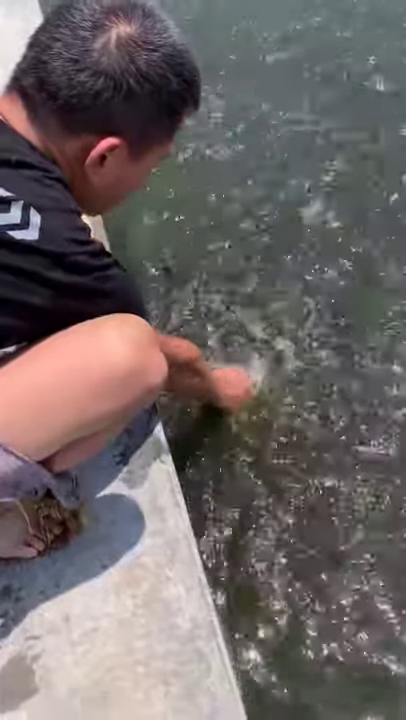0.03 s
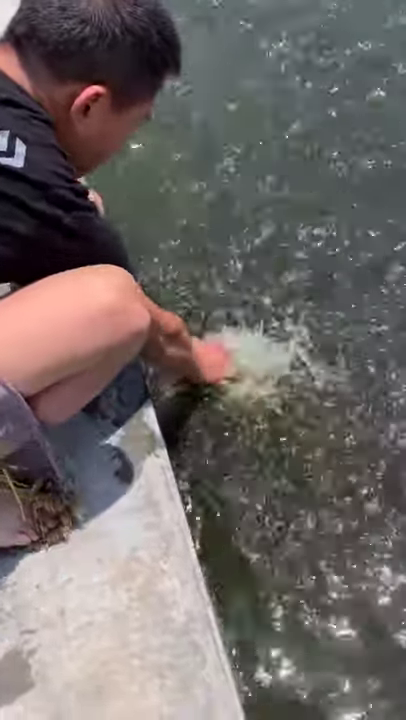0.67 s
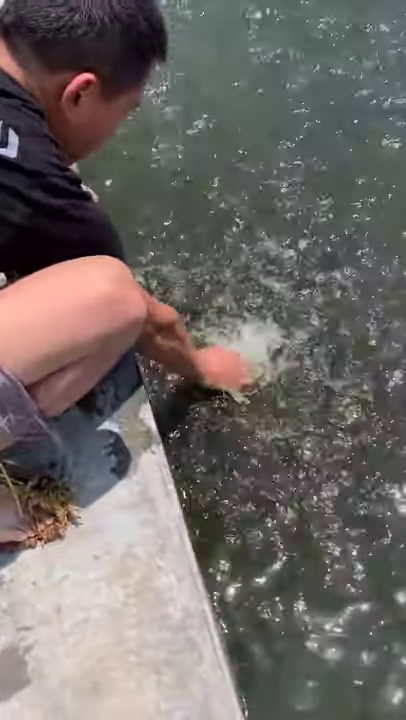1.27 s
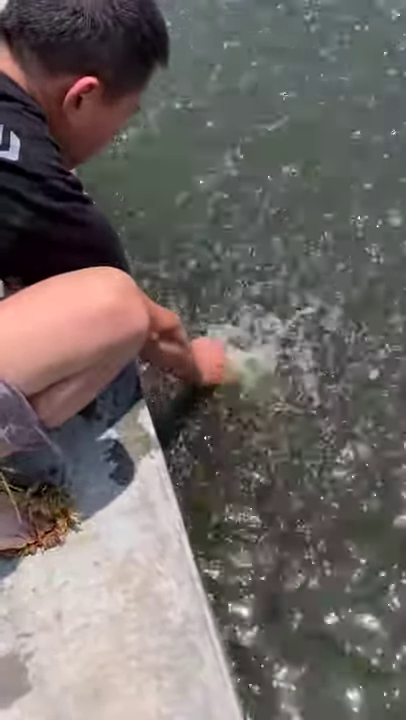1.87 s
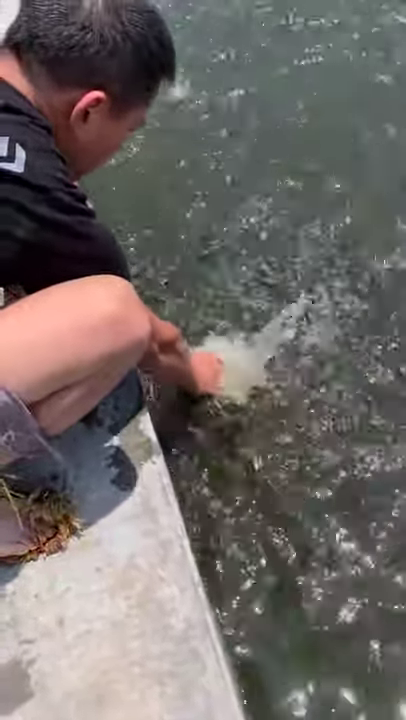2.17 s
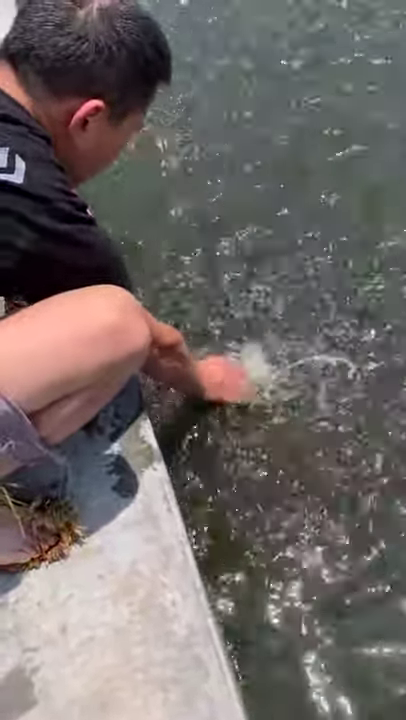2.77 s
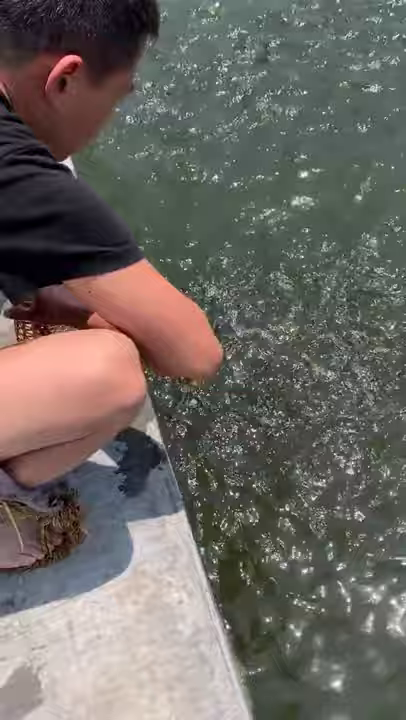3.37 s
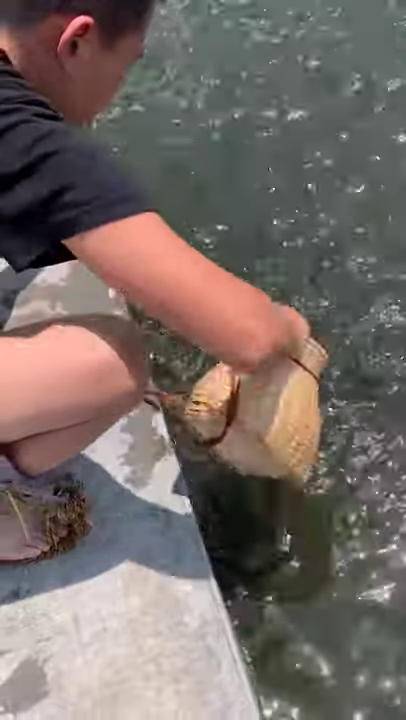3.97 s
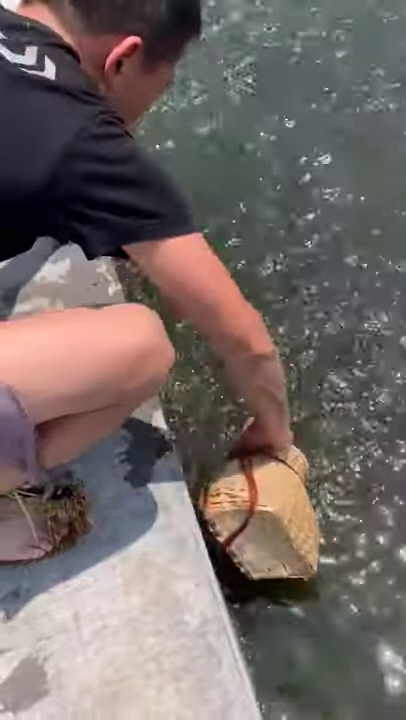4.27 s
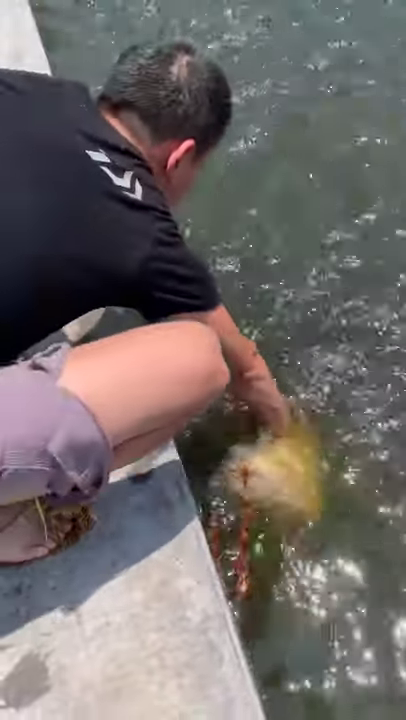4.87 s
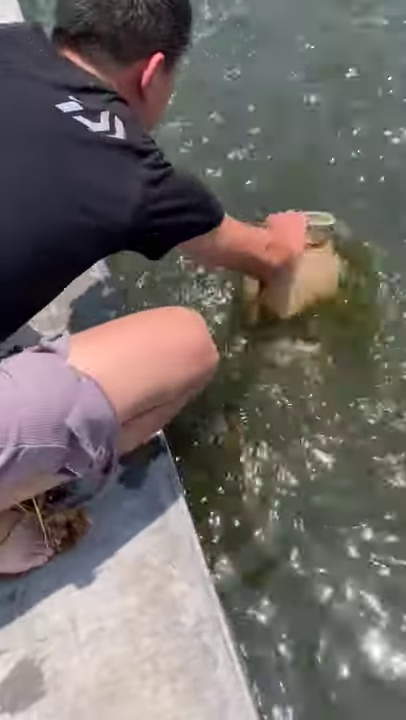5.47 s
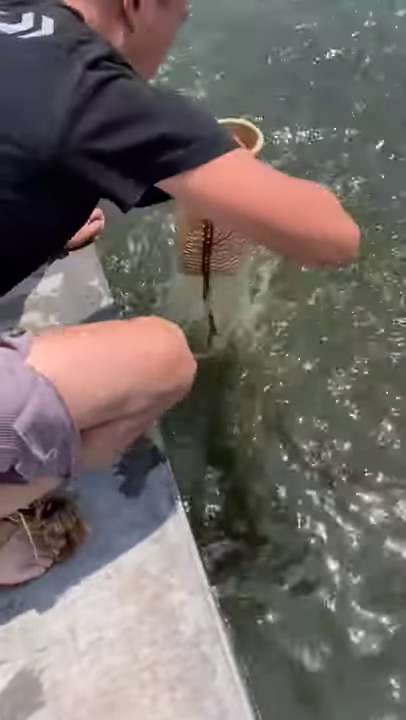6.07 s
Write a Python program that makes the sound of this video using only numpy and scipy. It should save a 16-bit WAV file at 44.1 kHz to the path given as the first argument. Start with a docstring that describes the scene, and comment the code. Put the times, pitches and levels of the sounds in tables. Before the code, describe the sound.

At a riverside ledge, gusty wind buffets a close microphone with low rumbles and pops. Over it, a hand churns the water in a fast run of bright, bubbly splashes, then stops. Ripples lap quietly and a wicker basket ticks as it is picked up. It sloshes and glugs as it is dragged under, and finally water streams from it back into the river.

```python
"""At a windy riverside ledge, gusts rumble and pop on the two ports (openings) of a close microphone.
For three seconds a hand swishes to and fro in the water, about twelve slaps a second, throwing spray
and trapping air that rings as bubbles. Then a wicker basket is picked up, dipped and dragged under
with a few deep glugs. Last it is lifted, and water streams through its weave back into the river."""
import sys
import numpy as np
from scipy import signal
from scipy.fft import rfft, irfft, next_fast_len
from scipy.io import wavfile
from scipy.ndimage import uniform_filter1d

SR = 44100
rng = np.random.default_rng(int(sys.argv[2]) if len(sys.argv) > 2 else 0)


def log_audio(samples):
    """Write samples as a 16-bit WAV file to the path given in sys.argv[1]."""
    # one column per channel
    frames = np.atleast_2d(samples).T
    # limit to full scale, then quantise
    limited = np.clip(frames, -1, 1)
    pcm = np.round(limited * 32767).astype(np.int16)
    wavfile.write(sys.argv[1], SR, pcm)


N = 274743
TIME = np.arange(N) / SR
FFT_SIZE = next_fast_len(N + 8192)
FREQS_HZ = np.maximum(np.arange(FFT_SIZE // 2 + 1) * SR / FFT_SIZE, 1)
CUTOFF_HZ = 15800

# Levels in the tables are relative: the functions add gains of their own.
# the hand slaps the water on each stroke: middle t/s, level/dB, length/s, extra treble/dB
HAND_SLAPS = [(0.19, -37, 0.011, 4), (0.308, -30, 0.012, 8.5), (0.404, -24.5, 0.0054, 5),
              (0.495, -37, 0.14, -8), (0.589, -22.5, 0.0048, 1), (0.68, -20.5, 0.0075, 2.5),
              (0.75, -21, 0.014, -14), (0.77, -29, 0.014, -31), (0.813, -24, 0.0054, -8),
              (0.848, -34.5, 0.059, 10.5), (0.928, -16.5, 0.0056, -2), (1.005, -24, 0.0099, 6),
              (1.093, -24, 0.019, -11), (1.172, -19.5, 0.013, 0.5), (1.268, -25, 0.013, -3),
              (1.342, -24, 0.011, 1), (1.441, -21, 0.007, -4), (1.522, -29.5, 0.017, 6),
              (1.601, -25.5, 0.017, 0.5), (1.682, -23, 0.009, 1.5), (1.771, -25, 0.019, -5),
              (1.847, -25.5, 0.006, 0.5), (1.941, -24.5, 0.014, -1.5), (2.017, -24, 0.013, -0.5),
              (2.105, -25.5, 0.013, -2), (2.17, -24.5, 0.0039, 1), (2.177, -28.5, 0.029, 0.5),
              (2.261, -25, 0.02, -8.5), (2.34, -29.5, 0.024, -2), (2.433, -26.5, 0.026, -6),
              (2.505, -22, 0.016, -1.5), (2.598, -24.5, 0.016, -2.5), (2.685, -22.5, 0.0058, -27),
              (2.774, -28, 0.013, 1), (2.846, -21.5, 0.0087, -16), (2.931, -19, 0.012, -8),
              (3.015, -32.5, 0.02, 5)]
# water slops against the basket: middle t/s, level/dB, length/s, extra treble/dB
BASKET_SLOSHES = [(4.794, -34.5, 0.021, -6), (4.91, -36, 0.035, -12), (4.94, -32, 0.035, -29),
                  (4.972, -31, 0.012, -15), (5.033, -47, 0.021, 2), (5.09, -37.5, 0.016, -15),
                  (5.753, -38.5, 0.092, -27)]
# tone of splashing spray: f/Hz, level/dB
SPLASH_SPECTRUM = [(250, -10), (600, 1.5), (1000, -12), (1400, -3), (1800, 6), (2200, -0.5), (2900, -0.5),
                   (4000, -0.5), (5300, -6.5), (6300, -2), (7600, -10), (9200, -5), (11000, -9),
                   (15500, -13)]
# pockets of air snap shut: t/s, level/dB, centre f/Hz
AIR_CRACKS = [(0.319, -15, 2500), (0.59, -7, 2680), (0.6803, -10, 4450), (0.701, -13, 2600),
              (0.7505, -15, 2570), (0.7705, -8, 2200), (0.863, -9.5, 4960), (0.926, -17, 3600),
              (0.932, -6, 3850), (0.9544, -13, 2200), (1.0077, -9.5, 4160), (1.0153, -10.5, 5600),
              (1.34, -14, 3800), (1.354, -15, 4230), (1.4373, -12, 3280), (1.5168, -6, 4830),
              (1.614, -5, 4050), (1.9457, -14, 2570), (2.0137, -15.5, 4570), (2.1663, -15, 2280),
              (2.188, -22, 1890), (2.35, -14, 3700), (2.5161, -3.5, 3670), (2.521, -7, 3220),
              (2.6653, -17, 1810), (2.778, -14.5, 3860), (2.85, -11.5, 2620), (2.905, -20, 5540),
              (2.9358, -14.5, 3000), (3.008, -21, 5530), (4.855, -24, 4400), (4.9735, -19, 2470)]
# how hard the hand churns the water: t/s, level/dB
CHURN_LEVEL = [(0.0, -30), (0.76, -31.5), (1.53, -30.5), (2.23, -38), (2.82, -30.5), (3.1, -43.5)]
# the hand leaves the water: start t/s, end t/s
HAND_OUT_S = [3.0, 3.11]
# the basket enters the water: start t/s, end t/s
BASKET_IN_S = [4.3, 4.8]
# flow of water, first as ripples, then through the basket: t/s, level/dB
FLOW_LEVEL = [(3.0, -26), (3.14, -40), (3.72, -40.5), (4.03, -44), (4.16, -48.5), (4.28, -51.5),
              (4.41, -42.5), (4.75, -43), (4.97, -36), (5.12, -44.5), (5.3, -43), (5.5, -42.5),
              (5.55, -35.5), (5.73, -43), (5.79, -33), (6.0, -35.5), (6.23, -32)]
# tone of trickling water: f/Hz, level/dB
TRICKLE_SPECTRUM = [(400, -10), (750, -18), (1300, -6), (1900, -0.5), (2300, -4.5), (3200, -1.5), (4300, 1),
                    (5400, -1), (6300, -1), (7600, -7.5), (9200, -1.5), (11000, -5), (13000, -9),
                    (15500, -5.5)]
# the stream from the lifted basket: t/s, level/dB
POUR_LEVEL = [(5.5, -66), (5.56, -45.5), (5.73, -43), (5.79, -39), (5.88, -39.5), (6.0, -38), (6.23, -39)]
# thin jets through the weave: middle t/s, level/dB, length/s
WEAVE_JETS = [(4.82, -36, 0.021), (4.925, -38, 0.03), (4.977, -27, 0.0083), (5.054, -45, 0.048)]
# single large bubbles: t/s, level/dB, starting f/Hz, climb/(share of the pitch per s)
BIG_BUBBLES = [(0.316, -21, 955, 4), (0.318, -14, 1267, 8.5), (0.373, -13.5, 1293, 1), (0.496, -17, 930, 6),
               (0.587, -18, 1850, 2), (0.594, -18, 593, 7.5), (0.686, -19, 640, 5), (0.702, -20, 850, 14),
               (0.751, -19, 1170, 5), (0.775, -14, 1200, -6), (0.851, -13.5, 1085, 4),
               (0.899, -18, 1340, 5), (0.949, -9, 1850, 1), (0.952, -8, 1550, 7.5), (1.005, -13.5, 1750, 6),
               (1.026, -16, 1285, -6), (1.095, -15.5, 1193, 0.5), (1.102, -13, 1730, 10),
               (1.121, -16, 1820, 3), (1.165, -8.5, 610, 1.5), (1.178, -15, 2250, 4), (1.179, -25, 403, 5),
               (1.19, -15, 1290, 6), (1.345, -12.5, 1910, 0), (1.381, -18, 1730, -2), (1.435, -7, 624, -4),
               (1.607, -15, 1260, 2), (1.609, -6.5, 1800, 1), (1.691, -14.5, 1210, 1),
               (1.784, -15, 1810, 1), (2.02, -18, 565, 4), (2.046, -18.5, 896, 8), (2.104, -13, 1810, 4),
               (2.426, -18, 1076, 8), (2.608, -14, 734, 6), (2.664, -21, 1970, 2), (2.803, -17, 1260, 11),
               (2.847, -19, 2710, 6), (2.929, -7.5, 1592, 5), (2.928, -13, 1316, 8), (2.971, -18, 1700, -5),
               (3.075, -19.5, 1060, 10), (3.24, -21.5, 780, 12), (3.24, -11.5, 464, 1),
               (3.31, -28, 1030, 6), (3.328, -27.5, 2100, 7), (3.44, -27, 1880, 0), (3.51, -26, 1064, 0),
               (3.516, -26, 1900, 9), (3.561, -26, 950, 8), (3.664, -20.5, 1760, 0), (3.869, -30, 1610, 1),
               (3.902, -27, 1240, -3), (4.3274, -27, 3170, -4), (4.5828, -27, 1200, 4.5),
               (4.76, -3, 342, 4.5), (4.796, -28, 1210, -2), (4.8, -12.5, 660, 5), (4.935, -14.5, 783, 4),
               (4.938, -6.5, 286, -0.5), (4.94, -22, 1260, 0), (4.959, -9.5, 320, -5.5),
               (4.97, -23, 1160, 1), (4.998, -11.5, 500, 8), (5.088, -16.5, 725, 3), (5.09, -28, 1130, 2),
               (5.107, -13, 380, 11), (5.149, -13.5, 264, 1.5), (5.17, -26, 686, -1),
               (5.467, -30.5, 1680, 2), (5.52, -30, 1250, -1), (5.562, -25, 1010, 12),
               (5.578, -27, 1230, -1), (5.683, -27, 1240, 3), (5.761, -18, 1360, -2),
               (5.797, -20.5, 540, -2), (5.806, -16, 1160, 1), (5.939, -20, 1465, 1.5),
               (6.108, -18, 834, 1.5)]
# stray drops and wicker ticks: t/s, level/dB, f/Hz, fade of the crack/s (a fade is a fall of 60 dB)
DROPS_AND_TICKS = [(0.094, -17, 2800, 0.054), (0.201, -15, 2600, 0.044), (0.395, -15, 6500, .012),
                   (0.576, -14, 3400, .025), (0.932, -11, 7000, 0.015), (1.008, -15, 7000, 0.018),
                   (1.015, -13, 6500, .014), (1.228, -15, 7000, 0.013), (1.4432, -12, 7500, .012),
                   (1.6817, -15, 7000, .014), (1.9317, -14, 7000, .014), (2.014, -11, 7500, .012),
                   (2.5173, -11, 6500, .014), (2.904, -20, 6500, .012), (3.415, -23, 2940, 0.032),
                   (3.662, -24, 3300, 0.013), (3.779, -32, 6900, .012), (3.8236, -12, 3270, 0.022),
                   (3.8295, -21, 5340, 0.012), (3.831, -11, 2150, .045), (3.839, -36, 5940, .015),
                   (4.087, -24, 7400, 0.033), (4.092, -38, 6100, 0.022), (4.193, -32, 6600, .012),
                   (4.339, -29, 3000, .015), (4.8526, -14, 4000, .05), (4.9745, -26, 7050, .015),
                   (4.981, -24, 6900, .02), (4.9875, -22, 7540, 0.013), (5.044, -23, 7000, 0.013),
                   (5.115, -21.5, 6600, .014), (5.1936, -15.5, 6800, .013), (5.197, -25, 7000, .012),
                   (5.2916, -26, 4260, 0.028), (5.538, -18, 3300, 0.024)]
# how much louder the water is in the right port: f/Hz, level/dB
RIGHT_GAIN = [(500, -1.5), (2000, 1.13), (4500, -0.75), (12000, 0.5)]
# how far the water's sound lags in the right port: f/Hz, phase/rad
RIGHT_LAG = [(20, 0), (280, 0), (450, 2.0), (600, 1.7), (750, 1.1), (950, .7), (1400, .1), (2300, .5),
             (3500, 1.2), (4900, 3.1), (5600, 4.3), (6500, 6.2), (7500, 6.4), (9000, 9.4), (9550, 9.5),
             (9800, 7.4), (11200, 9.4), (12500, 12.4), (13600, 12.6), (15300, 15.7)]
# gusts on the ports: start t/s, length/s, buffeting level/dB, rumble level/dB
GUSTS = [(0.0, 0.012, -18, -14), (0.084, 0.15, -23.5, -17), (0.358, 0.036, -14.5, -19),
         (0.388, 0.026, -29, -11), (0.733, 0.082, -27, -20), (0.91, 0.17, -26.5, -20),
         (1.143, 0.33, -21, -18), (1.23, 0.014, -45, -12), (1.726, 0.11, -21.5, -15),
         (1.816, 0.091, -15, -19.5), (1.956, 0.012, -19.5, -20), (2.055, 0.18, -18.5, -13.5),
         (2.29, 0.06, -18.5, -17), (2.772, 0.15, -22.5, -16.5), (3.085, 0.049, -17.5, -10),
         (3.203, 0.056, -25, -18.5), (3.44, 0.3, -27, -18), (3.774, 0.12, -22.5, -11),
         (3.9, 0.18, -27, -26.5), (4.127, 0.079, -19.5, -9.5), (4.236, 0.096, -22.5, -19.5),
         (4.439, 0.0093, -15.5, -25), (4.656, 0.051, -32, -16.5), (4.76, 0.1, -19.5, -15),
         (4.932, 0.088, -19, -15), (5.048, 0.028, -15, -12), (5.105, 0.032, -18, -13.5),
         (5.305, 0.036, -27.5, -24.5), (5.439, 0.088, -22.5, -13), (6.058, 0.024, -27.5, -18),
         (6.138, 0.072, -28, -11.5)]
# tone of the buffeting, the wind's lumpy beating on the ports: f/Hz, level/dB
BUFFET_SPECTRUM = [(40, -12), (100, 2), (160, 8), (250, 2), (400, -3.5), (600, -10.5), (850, -30.5),
                   (1300, -24), (3000, -105)]
# the faster an eddy (a swirl of air), the less of it both ports share: f/Hz, likeness from 0 to 1
EDDY_LIKENESS = [(80, 1), (160, 0.94), (300, 0.026), (600, 0.0082)]
# the strongest eddies pop on the ports: t/s, level/dB, starting f/Hz
EDDY_POPS = [(0.14, -6.5, 584), (0.36, -2, 830), (0.389, -10, 535), (0.562, -18, 490), (0.726, -8, 524),
             (0.784, -10.5, 515), (1.061, -7, 514), (1.144, -6.5, 734), (1.214, -17, 605), (1.244, -9, 770),
             (1.316, -9.5, 635), (1.356, -7.5, 535), (1.408, -8.5, 734), (1.434, -13, 750),
             (1.456, -5.5, 647), (1.491, -4, 630), (1.722, -6.5, 810), (1.757, -16, 900), (1.776, -5, 870),
             (1.795, -9.5, 1100), (1.821, -8.5, 1170), (1.907, -4.5, 704), (1.965, -10, 636),
             (2.071, -4, 730), (2.086, -3.5, 590), (2.115, -4, 645), (2.172, -4.5, 684), (2.307, -7, 640),
             (2.322, -7, 547), (2.696, -14.5, 567), (2.77, -6.5, 690), (2.806, -6, 800), (2.845, -7, 770),
             (2.877, -7.5, 630), (3.073, -3, 654), (3.091, -8, 594), (3.127, -0.5, 420), (3.205, -10, 520),
             (3.273, -14.5, 690), (3.38, -11, 653), (3.434, -13, 687), (3.483, -11, 700),
             (3.504, -11.5, 705), (3.522, -15, 420), (3.572, -14, 730), (3.601, -9, 670),
             (3.641, -10.5, 724), (3.714, -13, 710), (3.732, -15, 604), (3.773, -4, 940), (3.802, -6, 1000),
             (3.841, -4, 764), (3.871, -8, 504), (4.063, -11.5, 920), (4.09, -8, 1010), (4.108, -2, 1460),
             (4.122, -3, 620), (4.139, -5.5, 524), (4.162, -15, 597), (4.181, -2.5, 626), (4.243, -9, 850),
             (4.276, -4, 1350), (4.291, -9.5, 690), (4.427, -5, 2020), (4.448, -0.5, 305),
             (4.447, -14.5, 1740), (4.799, -5.5, 870), (4.836, -5.5, 815), (5.045, -1.5, 730),
             (5.064, -7, 420), (5.121, -4, 830), (5.462, -3.5, 544), (5.513, -8, 566), (6.077, -15.5, 600),
             (6.183, -10, 525)]
# tone of the wind's rumble: f/Hz, level/dB
RUMBLE_SPECTRUM = [(25, -22), (45, -2.5), (65, -5.5), (90, 1), (120, -4.5), (160, -12.5), (260, -29),
                   (500, -38), (1000, -135), (3000, -100)]
# the air heaves slowly under the gusts: t/s, level/dB
HEAVE_LEVEL = [(0.0, -23), (0.6, -31), (1.0, -20.5), (1.45, -21), (1.58, -32.5), (1.9, -22.5),
               (2.35, -20.5), (2.45, -25), (2.72, -33), (3.0, -22), (3.35, -25.5), (3.78, -18), (4.5, -30),
               (4.7, -21.5), (5.25, -29), (5.9, -28.5), (6.2, -31)]
# tone of that deep heaving: f/Hz, level/dB
HEAVE_SPECTRUM = [(10, -32), (22, -9), (35, 1), (48, -9), (65, 6), (120, -71), (400, -90)]


def splashes(spray_db=-3, gulp_db=-6, fine_db=-11, hollow_db=-8, hollow_lag_s=0.0091):
    """Each splash throws spray and pushes air under, from pinhead bubbles to a hollow that closes late."""
    level, treble_db = splash_level()
    thrown = spray(SPLASH_SPECTRUM, treble_db + 3, per_s=9000, spread_db=2, clump_db=2, likeness=0.86)
    gulps = bubbles(count=2200, low_hz=861, high_hz=3300, cycles=28, rise=0.055, spread_db=0)
    fine = bubbles(count=2200, low_hz=3600, high_hz=10500, cycles=50, rise=.03, spread_db=7)
    hollow = bubbles(count=700, low_hz=260, high_hz=680, cycles=14, rise=.12, spread_db=2)
    splash = from_db(spray_db) * thrown + from_db(gulp_db) * gulps + from_db(treble_db + fine_db) * fine
    closing = np.interp(TIME - hollow_lag_s, TIME, level) * from_db(hollow_db)
    return level * splash + closing * hollow


def splash_level(swell_share=0.36, tail_db=-14, tail_s=0.059):
    """Gain and extra treble (dB) of the splashes: each swells, collapses and leaves a short patter."""
    power, brightness = np.full(N, 1e-9), np.zeros(N)
    t = np.arange(-SR // 20, SR // 5) / SR
    for s, db, length, treble_db in HAND_SLAPS + BASKET_SLOSHES:
        burst = np.exp(-(t / (length * np.where(t < 0, swell_share, 1))) ** 2)
        tail = (t > 0) * from_db(tail_db) ** 2 * np.exp(-np.abs(t) / tail_s)
        shape = from_db(db) ** 2 * (burst + tail)
        add(power, s + t[0], shape)
        add(brightness, s + t[0], shape * treble_db)
    return np.sqrt(power), brightness / power


def cracks(fade_s=0.0096, swell_s=0.00042, width=1.45):
    """A hard slap snaps a pocket of air shut: a tiny burst of noise, lower for a larger pocket."""
    out, t = np.zeros(N), np.arange(SR // 40) / SR
    for s, db, hz in AIR_CRACKS:
        burst = rng.standard_normal(len(t)) * from_db(-60 * t / fade_s) * (1 - np.exp(-t / swell_s))
        band = signal.butter(2, [hz / width, min(hz * width, SR / 3)], "band", fs=SR, output="sos")
        snap = signal.sosfilt(band, burst)
        add(out, s, from_db(db) * snap / np.abs(snap).max())
    return out


def churning(froth_db=-3, glug_db=-5, fine_db=-11, foam_lag_s=0.0072):
    """The stirred water foams, bubbles and glugs as long as the hand is in it."""
    # the foam surges around each slap and sinks in between
    smooth_slaps = uniform_filter1d(splash_level()[0], size=SR // 16)
    surge = evened(smooth_slaps[None] + 0.0043, span_s=0.81)[0]
    surge = np.interp(TIME - foam_lag_s, TIME, surge)
    level = from_db(over_time(CHURN_LEVEL)) * surge * np.interp(TIME, HAND_OUT_S, [1, 0])
    foam = spray(SPLASH_SPECTRUM, treble_db=-2, per_s=5000, spread_db=3.5, clump_db=2.5, likeness=0.88)
    froth = bubbles(count=2800, low_hz=800, high_hz=3500, cycles=26, rise=.07, spread_db=5.2)
    glugs = bubbles(count=600, low_hz=480, high_hz=1000, cycles=12, rise=.1, spread_db=5)
    fine = bubbles(count=1800, low_hz=3600, high_hz=11000, cycles=70, rise=.03, spread_db=7)
    return level * (foam + from_db(froth_db) * froth + from_db(glug_db) * glugs + from_db(fine_db) * fine)


def basket_water(fizz_db=2.5, drip_db=-2.5, glug_db=-7, strong_flow_db=-32):
    """Ripples lap; then water runs in and out through the weave as brighter fizz and small bubbles."""
    flow_db = over_time(FLOW_LEVEL)
    bubbling_db = flow_db + (flow_db - strong_flow_db)  # a stronger flow traps more air
    treble_db = np.interp(TIME, BASKET_IN_S, [-8, -5.5])
    fizz = spray(TRICKLE_SPECTRUM, treble_db, per_s=7300, spread_db=1, clump_db=-0.5, likeness=0.99)
    drips = bubbles(count=2600, low_hz=1000, high_hz=3000, cycles=32, rise=.03, spread_db=4.3)
    glugs = bubbles(count=900, low_hz=700, high_hz=1400, cycles=24, rise=.02, spread_db=3.5)
    bubbling = from_db(drip_db) * drips + from_db(glug_db) * glugs
    water = from_db(flow_db + fizz_db) * fizz + from_db(bubbling_db) * bubbling
    return water * np.interp(TIME, HAND_OUT_S, [0, 1])


def pouring(gurgle_db=-2, patter_db=-2, mist_db=-4):
    """The falling stream drives air deep, so it gurgles under a dense patter of small bubbles."""
    gurgle = bubbles(count=1500, low_hz=420, high_hz=1100, cycles=26, rise=.04, spread_db=2.5)
    patter = bubbles(count=6000, low_hz=1100, high_hz=4000, cycles=34, rise=.04, spread_db=4.5)
    mist = bubbles(count=5000, low_hz=5500, high_hz=15000, cycles=30, rise=.02, spread_db=4)
    level = from_db(over_time(POUR_LEVEL)) * (TIME > POUR_LEVEL[0][0])
    return level * (from_db(gurgle_db) * gurgle + from_db(patter_db) * patter + from_db(mist_db) * mist)


def jets(low_hz=8200, flicker_db=3):
    """The plunge forces thin jets through the weave; they hiss high above the rest of the water."""
    level = sum(from_db(db) * np.exp(-((TIME - s) / length) ** 2 / 2) for s, db, length in WEAVE_JETS)
    hiss = filtered(clicks(per_s=20000, spread_db=5), high_pass(low_hz, 8) * low_pass(CUTOFF_HZ, 12))
    return level * hiss / np.std(hiss) * from_db(flicker_db * drift(200))


def plops(gain_db=-1, typical_fade_s=0.037, typical_hz=1500, typical_swell_s=0.0012):
    """A large bubble rings once, most often gliding up; a lower note swells and dies more slowly."""
    out, t = np.zeros(N), np.arange(SR // 10) / SR
    for s, db, hz, climb in BIG_BUBBLES:
        age = t * np.sqrt(hz / typical_hz)
        shape = from_db(db + gain_db - 60 * age / typical_fade_s) * (1 - np.exp(-age / typical_swell_s))
        add(out, s, shape * np.sin(2 * np.pi * hz * t * (1 + climb * t / 2)))
    return out


def ticks(crack_db=-4, ring_db=-8, ring_fade_s=0.0055):
    """Drops and wicker give a dry crack and a short ring; a higher ring has a brighter crack."""
    out, t = np.zeros(N), np.arange(SR // 20) / SR
    for s, db, hz, crack_fade_s in DROPS_AND_TICKS:
        crack = np.diff(rng.standard_normal(len(t) + 1)) * from_db(crack_db - 60 * t / crack_fade_s)
        crack = signal.lfilter(*signal.butter(1, min(1.2 * hz, SR / 3), fs=SR), crack)
        ring = np.sin(2 * np.pi * hz * t) * from_db(ring_db - 60 * t / ring_fade_s)
        add(out, s, from_db(db) * (crack + ring))
    return out


def spray(spectrum, treble_db, per_s, spread_db, clump_db, likeness):
    """Countless tiny droplets land in clumps; the finest, above about 4 kHz, have clumps of their own."""
    drops = stereo(clicks(per_s, spread_db), clicks(per_s, spread_db), likeness)
    drops *= from_db(clump_db * drift(450))
    drops = evened(filtered(drops, from_db(over_frequency(spectrum))), span_s=0.048)
    treble = filtered(drops, high_pass(4300, 4))
    finest = filtered(treble, high_pass(8500, 6))
    fine = (treble - finest) * from_db(3 * drift(160)) + finest * from_db(1.2 * drift(210))
    return (drops - treble) * from_db(2.6 * drift(120)) + fine * from_db(treble_db)


def bubbles(count, low_hz, high_hz, cycles, rise, spread_db):
    """Steady bubbling: each bit of trapped air rings briefly, rising in pitch as it nears the surface."""
    out = np.zeros((1, N))
    for when, pitch, life, rank in rng.random((count, 4)):
        hz = low_hz * (high_hz / low_hz) ** pitch
        fade_s = cycles * 2 ** (2 * life - 1) / hz
        age = np.arange(int(fade_s * SR * 2 / 3) + 2) / (fade_s * SR)
        phase = 2 * np.pi * hz * fade_s * age * (1 + rise * age / 2)
        # small bubbles die sooner but start louder
        shape = np.sqrt(hz / low_hz) * np.exp(-np.log(1000) * age) * phase / (phase + np.pi)
        gain = from_db(-spread_db * np.log(max(rank, .05)))
        add(out, when * N / SR, gain * shape * np.sin(phase))
    return evened(out, span_s=0.15)


def ledge_echo(sound, gain_db=-9, fade_s=0.1):
    """The ledge and the water's surface scatter back a short, dull echo, different at each port."""
    t = np.arange(SR // 8) / SR
    tail = rng.standard_normal((2, len(t))) * from_db(-60 * t / fade_s) * (t > .002)
    tail /= np.sqrt(np.sum(tail ** 2, axis=1, keepdims=True))
    return from_db(gain_db) * filtered(sound, rfft(tail, FFT_SIZE) * low_pass(3500, 2))


def wind(buffet_db=-0.55, buffet_flutter_db=4, rumble_db=-3, rumble_flutter_db=1.44):
    """Air blows over the ports: a deep heave and a rumble lie under fluttering buffeting and pops."""
    gust = gust_level(column=2, swell_s=0.026, fall_s=0.016, breeze_db=-44)
    gust *= from_db(buffet_db + buffet_flutter_db * drift(28))
    rumble_level = gust_level(column=3, swell_s=0.0049, fall_s=0.017, breeze_db=-25)
    rumble_level *= from_db(rumble_db + rumble_flutter_db * drift(15))
    heave = from_db(over_time(HEAVE_LEVEL)) * air_noise(HEAVE_SPECTRUM, likeness=0.91, span_s=0.155)
    rumble = rumble_level * air_noise(RUMBLE_SPECTRUM, likeness=0.73, span_s=0.053)
    return heave + rumble + buffeting(gust) + pops(gust)


def buffeting(gust, smear_cycles=1.902, smear_hz=150, brisk_db=-21, dulling=0.53):
    """Eddies beat on the ports in lumps, whose low notes trail their high ones."""
    lumps = [rfft(clicks(per_s=400, spread_db=3.3), FFT_SIZE) for port in range(2)]
    eddies = stereo(*lumps, over_frequency(EDDY_LIKENESS)) * from_db(over_frequency(BUFFET_SPECTRUM))
    smear = np.exp(-2j * np.pi * smear_cycles * np.log(1 + FREQS_HZ / smear_hz))
    buffet = evened(irfft(eddies * smear, FFT_SIZE)[:, :N], span_s=0.0326)
    # slow air makes only slow eddies, so a weak gust sounds duller
    slow = filtered(buffet, low_pass(368, 6))
    briskness = np.minimum(gust / from_db(brisk_db), 1) ** dulling
    return gust * (slow + briskness * (buffet - slow))


def pops(gust, gain_db=-2.5, cycles=2.213, decay_s=0.0076, wake_db=-16, wake_s=0.011):
    """An eddy strikes the ports with a sharp snap that is heard as a quick falling chirp, its low notes
    trailing its high ones; a dull, ragged wake follows."""
    out, t = np.zeros((2, N)), np.arange(SR // 20) / SR
    eddies = EDDY_POPS + lesser_eddies(gust)
    dull_band = signal.butter(2, [120, 520], "band", fs=SR, output="sos")
    wake_shape = from_db(wake_db) * (t / wake_s) ** 2 * np.exp(1 - (t / wake_s) ** 2)
    for (s, db, hz), (skew, sweep, life) in zip(eddies, rng.uniform(-1.03, 1, (len(eddies), 3))):
        turns = cycles * 1.35 ** sweep
        phase = 2 * np.pi * turns * np.log(1 + t * hz / turns)
        shape = (1 - np.exp(-(phase / 6) ** 2)) * np.exp(-(t / (decay_s * 1.3 ** life)) ** 2)
        snap = shape * np.sin(phase + .75 * skew * np.array([[1], [-1]]))  # the ports are out of step
        wake = signal.sosfilt(dull_band, rng.standard_normal((2, len(t))))
        add(out, s, from_db(db + gain_db) * (snap + wake_shape * wake / np.std(wake)))
    return out


def lesser_eddies(gust, count=25, over_gust_db=-4, typical_hz=656):
    """Random pops take their strength from the gust that carries them; rows as in EDDY_POPS."""
    return [(when * N / SR, 20 * np.log10(gust[int(when * N)]) + over_gust_db,
             typical_hz * 2 ** (pitch - .5)) for when, pitch in rng.random((count, 2))]


def gust_level(column, swell_s, fall_s, breeze_db):
    """Gain of the wind over time: each gust swells, holds and dies away above a steady breeze."""
    power = from_db(breeze_db) ** 2
    for gust in GUSTS:
        start, length = gust[:2]
        outside = np.maximum(start - TIME, 0) / swell_s + np.maximum(TIME - start - length, 0) / fall_s
        power = power + (from_db(gust[column]) * np.exp(-np.minimum(outside, 20))) ** 2
    return np.sqrt(power)


def air_noise(spectrum, likeness, span_s):
    """Steady noise of moving air, partly shared by the two ports."""
    noise = stereo(*rng.standard_normal((2, N)), likeness)
    return evened(filtered(noise, from_db(over_frequency(spectrum))), span_s)


def clicks(per_s, spread_db):
    """Random clicks, many small and a few large, at an average (rms) level of 1."""
    sizes = from_db(spread_db * np.minimum(rng.exponential(1, N), 4)) * rng.choice([-1, 1], N)
    train = sizes * (rng.random(N) < per_s / SR)
    return train / np.std(train)


def drift(per_s):
    """A random wobble of size about 1 that heads for a new value per_s times a second."""
    points = rng.standard_normal(32768)
    return np.interp(TIME * per_s, np.arange(len(points)), points) * np.sqrt(3 / 2)


def stereo(shared, apart, likeness):
    """Left and right channels: the same at likeness 1, unrelated at 0."""
    return np.sqrt((1 + likeness) / 2) * shared + np.sqrt((1 - likeness) / 2) * apart * [[1], [-1]]


def evened(sound, span_s):
    """Holds the average (rms) level at 1 over stretches of span_s; faster detail stays."""
    power = uniform_filter1d(np.mean(sound ** 2, axis=0), int(span_s * SR))
    return sound / np.sqrt(np.abs(power) + 1e-12)


def from_db(db):
    """Turns decibels into a gain to multiply by."""
    return 10 ** (np.asarray(db) / 20)


def over_time(table):
    """Joins a table's points into one value for each sample."""
    return np.interp(TIME, *np.transpose(table))


def over_frequency(table):
    """Joins a table's points into one value for each frequency, with octaves evenly spaced."""
    hz, value = np.transpose(table)
    return np.interp(np.log(FREQS_HZ), np.log(hz), value)


def low_pass(hz, steepness):
    """Gains that keep what lies below hz."""
    return 1 / (1 + (FREQS_HZ / hz) ** steepness)


def high_pass(hz, steepness):
    """Gains that keep what lies above hz."""
    return 1 / (1 + (hz / FREQS_HZ) ** steepness)


def filtered(sound, gains):
    """Multiplies each frequency of a sound by its gain."""
    return irfft(rfft(sound, FFT_SIZE) * gains, FFT_SIZE)[..., :N]


def add(track, start_s, sound):
    """Mixes a short sound into a track."""
    at = int(np.clip(start_s * SR, 0, N - 1))
    track[..., at:at + sound.shape[-1]] += sound[..., :N - at]


def scene():
    """The water's sound reaches the left port first; the wind acts on the ports themselves."""
    left, right = (splashes() + cracks() + churning()
                   + basket_water() + pouring() + jets() + plops() + ticks())
    right = filtered(right, from_db(over_frequency(RIGHT_GAIN)) * np.exp(-1j * over_frequency(RIGHT_LAG)))
    return np.array([left, right]) + ledge_echo(left) + wind()


def record(dry, ceiling=.85):
    """Rounds off the highest peaks and cuts the very top of the treble."""
    rounded = dry / (1 + (dry / ceiling) ** 4) ** (1 / 4)
    return signal.sosfilt(signal.ellip(10, .1, 80, CUTOFF_HZ, fs=SR, output="sos"), rounded)


dry = scene()
out = record(dry)
log_audio(out)
```